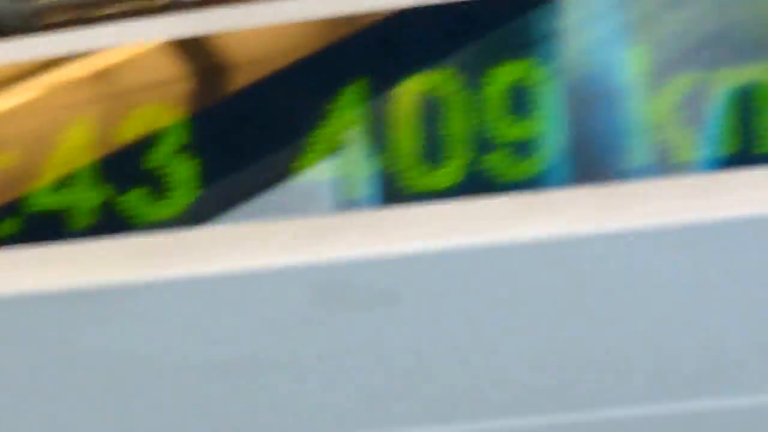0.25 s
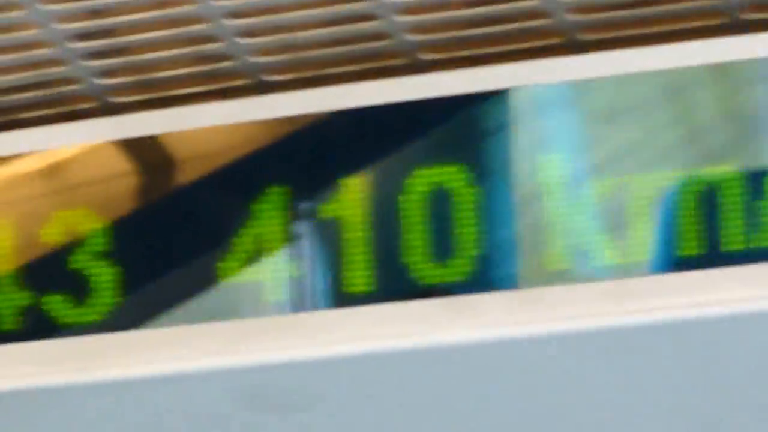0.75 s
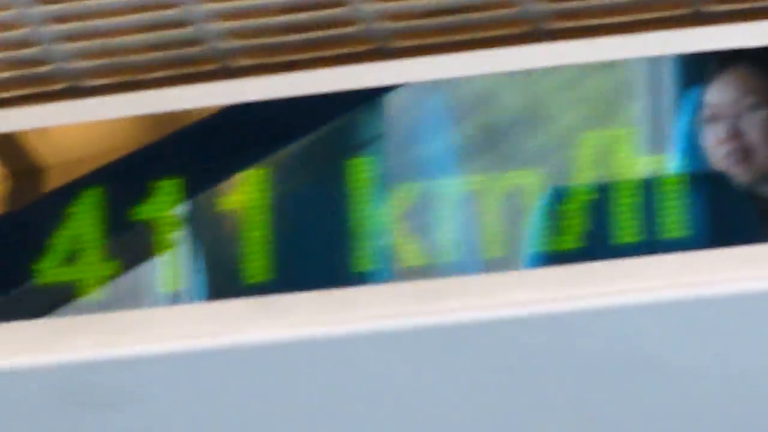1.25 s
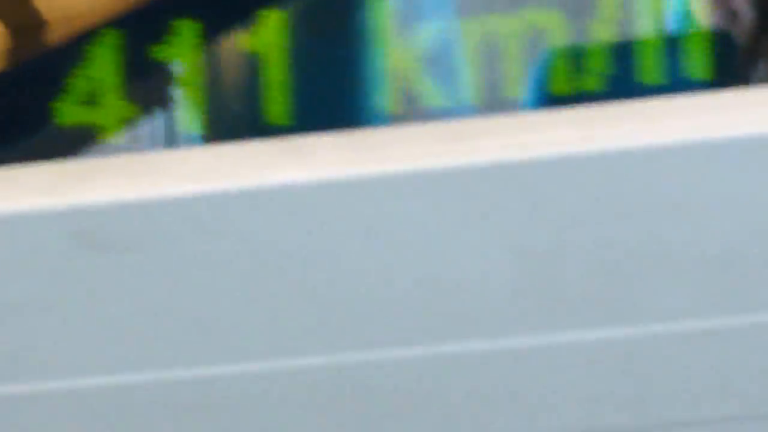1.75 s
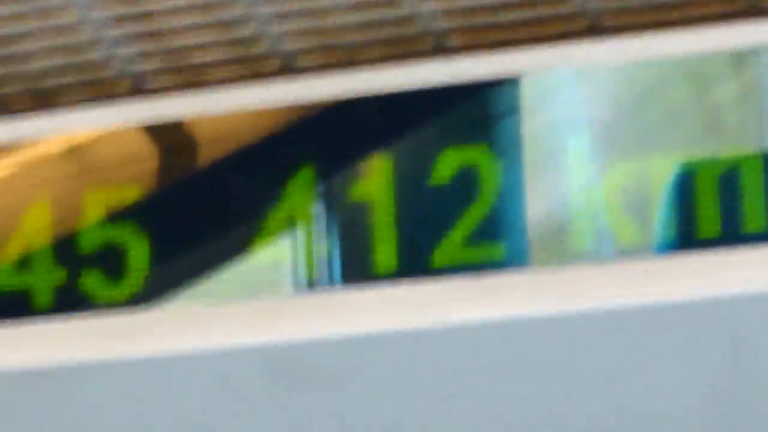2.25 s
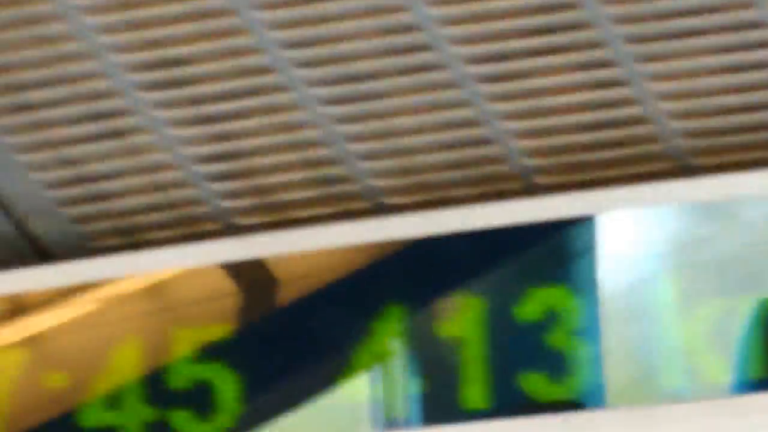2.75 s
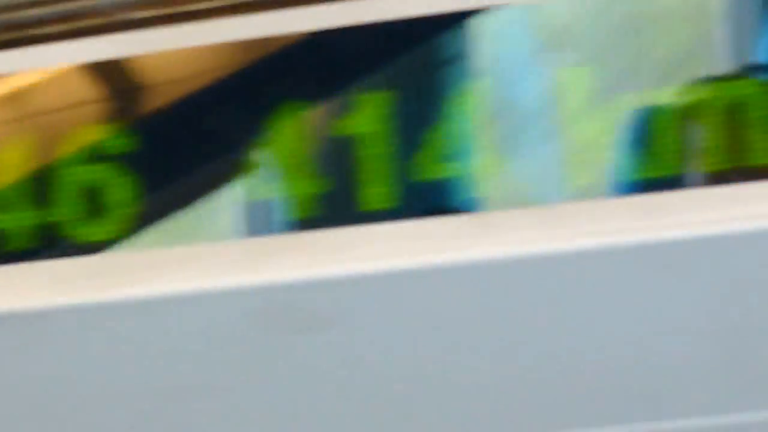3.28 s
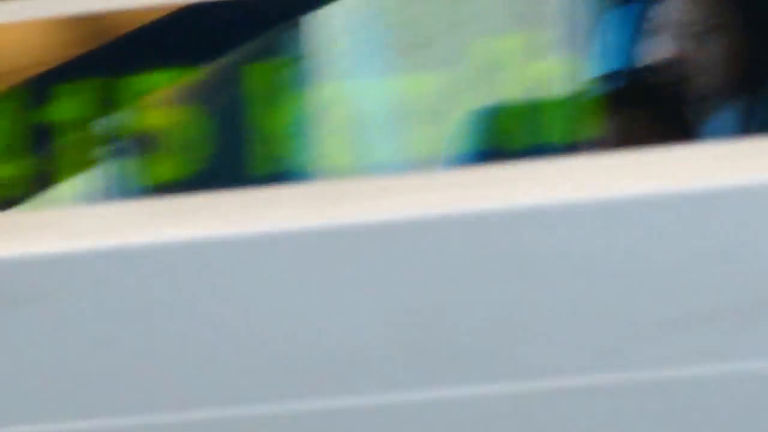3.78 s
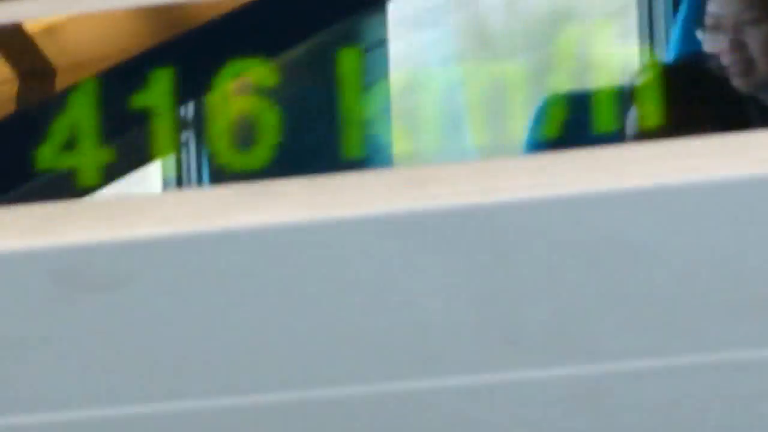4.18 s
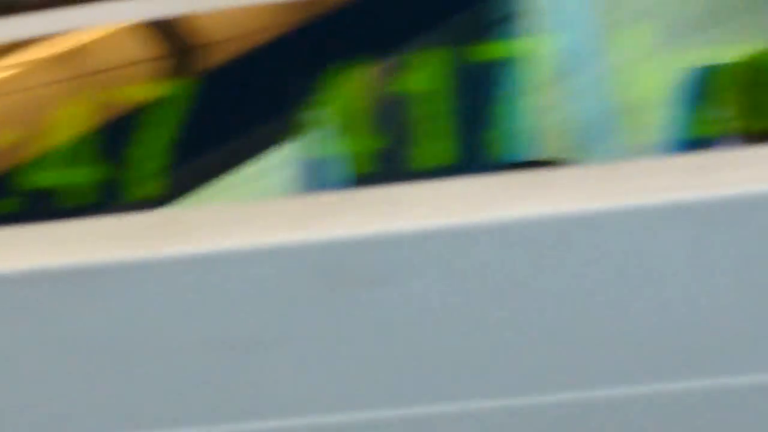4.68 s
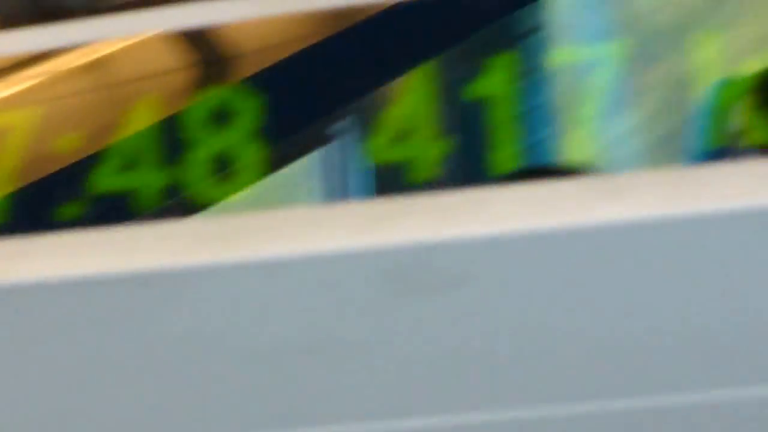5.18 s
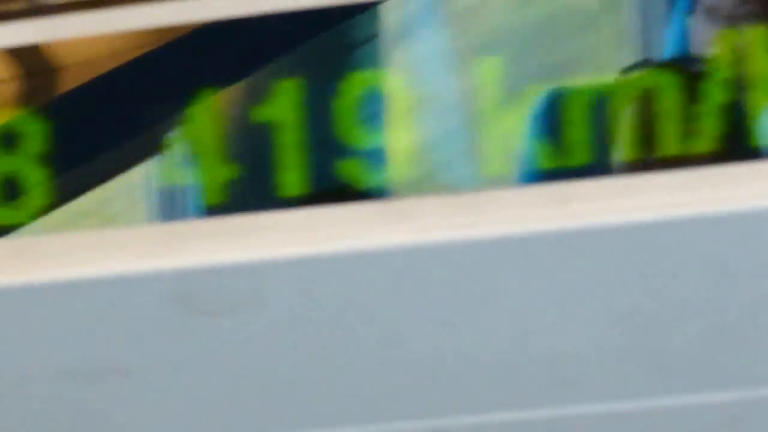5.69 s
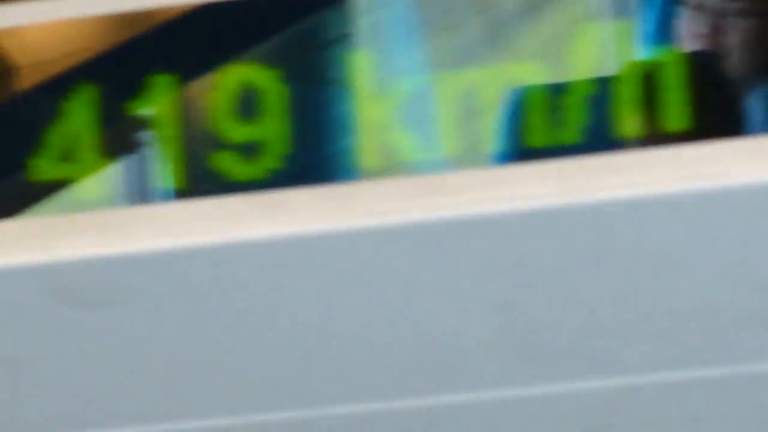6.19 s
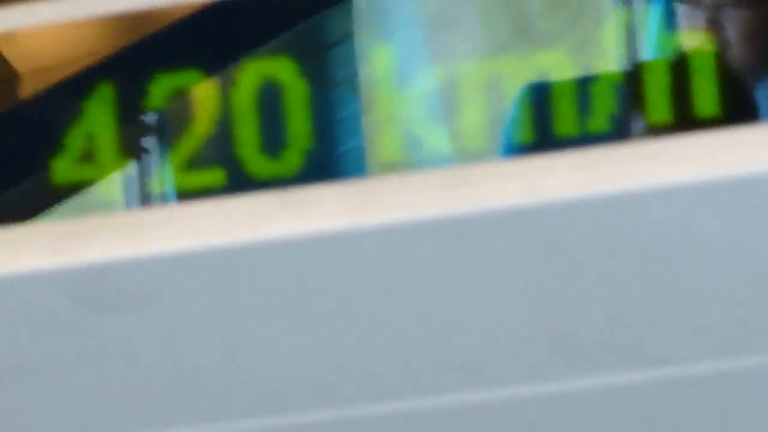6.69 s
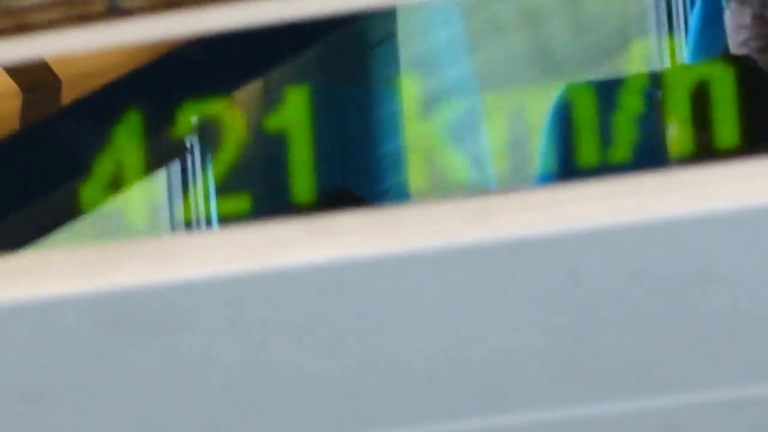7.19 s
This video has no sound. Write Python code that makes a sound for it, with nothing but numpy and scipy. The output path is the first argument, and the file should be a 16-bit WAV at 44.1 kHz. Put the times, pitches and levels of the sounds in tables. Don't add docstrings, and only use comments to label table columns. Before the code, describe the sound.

Inside a very fast train cabin, a dense steady roar of rushing air with a thin, wavering whistle on one pitch and tiny ticks.

```python
import sys
import numpy as np
from scipy import signal
from scipy.fft import next_fast_len
from scipy.io import wavfile
from scipy.ndimage import uniform_filter1d

SR = 44100
rng = np.random.default_rng(int(sys.argv[2]) if len(sys.argv) > 2 else 0)


def materialize(psi):
    bounded = np.clip(np.atleast_2d(psi).T, -1, 1)
    quanta = np.round(bounded * 32767).astype(np.int16)
    wavfile.write(sys.argv[1], SR, quanta)


def ratio_of_db(decibels):
    return 10 ** (np.asarray(decibels, float) / 20)


N = 328104


def evened(x):
    return x / np.sqrt(np.mean(x ** 2) + 1e-20)


def along(rows, column):
    columns = np.transpose(rows)
    return np.interp(np.arange(N) / SR, columns[0], columns[column])


def add(mix, start_s, sound):
    part = mix[round(start_s * SR):][:len(sound)]
    part += sound[:len(part)]


def bumps(rows):
    t = np.arange(N) / SR
    return sum(db * np.exp(-2 * ((t - s) / length) ** 2) for s, db, length in rows)


def smoothed(x, size, second_size=None, axis=0):
    return uniform_filter1d(uniform_filter1d(x, size, axis=axis), second_size or size, axis=axis)


def wander(top_hz):
    size = max(int(SR / top_hz / 2), 2)
    return evened(smoothed(rng.standard_normal(N), size))


def resonate(x, hz, width):
    turn = np.exp(2j * np.pi * np.cumsum(hz * np.ones(len(x))) / SR)
    r = np.exp(-np.pi * width / SR)
    return 2 * (turn * signal.lfilter([1 - r], [1, -r], x / turn)).real


def resonant_noise(hz, width):
    white = rng.standard_normal(N)
    return evened(resonate(resonate(white, hz, width), hz, width))


def turbulence(spectrum, patchy_db, flicker_db):
    frames, hz = N // 512 + 5, np.fft.rfftfreq(2048, 1 / SR)
    real, imaginary, patches = rng.standard_normal((frames, 1025, 3)).T
    patches = uniform_filter1d(patches, size=24, axis=0)
    patches = evened(uniform_filter1d(patches, size=6, axis=1))
    f, db = np.transpose(spectrum)
    colour_db = np.interp(np.log(hz + 1), np.log(f + 1), db, left=-120, right=-120)
    z = (real + 1j * imaginary) * ratio_of_db(colour_db[:, None] + patchy_db * patches)
    noise = signal.istft(z, nperseg=2048, noverlap=1536)[1][768:][:N]
    return evened(noise * ratio_of_db(flicker_db * wander(28)))


# [f/Hz, density level/dB]
BOOM_SPECTRUM = [(12, -56), (20, -40), (56, -10), (102, -3), (136, -7), (178, 0), (205, -5), (243, 0),
                 (291, 0.5), (362, -5.5), (440, -13.5), (570, -17), (970, -120)]
# [f/Hz, width/Hz, level/dB]
CABIN_MODES = [(111.3, 10.7, -40.5), (183.4, 21, -43), (247.2, 22.4, -39), (303, 7.9, -39.5),
               (338.3, 6.7, -42.5), (511.4, 35, -42), (1589, 26, -53), (3760, 740, -55.5)]


def cabin_boom():
    boom = turbulence(BOOM_SPECTRUM, patchy_db=0.28, flicker_db=-0.7)
    for hz, width, db in CABIN_MODES:
        boom = boom + ratio_of_db(db + 25) * resonant_noise(hz, width)
    return evened(boom)


# [f/Hz, density level/dB]
ROAR_SPECTRUM = [(240, -18.5), (400, -0.5), (515, 1.5), (689, -1), (797, -3.5), (1040, -6), (1080, -12),
                 (1400, -32.5), (2380, -120)]
RUSH_SPECTRUM = [(690, -29.5), (1180, -5), (1200, -1.5), (1260, -5), (2360, -12.5), (2830, -16.5),
                 (3400, -18), (5000, -34), (6500, -51.5), (11000, -120)]
# [f/Hz, density level/dB]
HISS_SPECTRUM = [(2820, -41), (4800, -1.5), (10800, -18), (14000, -54.5), (22000, -120)]
LAYER_DB = [-26, -29, -35, -56.5]
# [t/s, depth/dB, length/s]
LULLS = [(.28, 1.5, 0.079), (.51, 3, .06), (.71, 3.5, .04), (.9, 2, 0.093), (1.7, 3, .1), (1.92, 1.5, .05),
         (2.67, 3.5, 0.064), (2.98, 4, 0.046), (3.17, 1.5, 0.046), (3.93, 1, .05), (5.1, 1.5, 0.044),
         (5.22, 0, .04), (5.76, 3, .07), (5.98, 3, 0.081), (6.3, 1, 0.11), (7.14, 1, 0.038), (7.36, 0, .05)]
# [t/s, lift/dB, length/s]
GUSTS = [(.15, 0, .08), (.81, 2, .07), (1.1, 1, .15), (1.47, 1, .12), (2.1, 0.5, .1), (2.55, 0.5, 0.092),
         (3.5, 0.3, 0.14), (4.35, 1, .25), (4.92, 1.5, 0.22), (5.42, 1.5, .12), (6.12, 1, .08),
         (6.6, 1, .2), (6.9, 1, 0.11)]
# [t/s, lift/dB, length/s]
RUSTLES = [(.02, -1, .04), (.41, 3, .05), (1.03, 3, .025), (1.58, 3, .06), (2.33, 3, .15),
           (2.865, 3.5, .025), (3.11, 1.5, .04), (3.48, 4, .04), (3.81, 1.5, .04), (3.99, 4, .025),
           (4.53, 1.5, .04), (4.71, 3, .05), (5.305, 6, .016), (5.62, 2, 0.11), (6.64, 1.5, 0.036),
           (7.02, 4, .05), (7.3, 3, 0.046)]
LULL_SHARE = [0.18, 1, 0.99, 0.58]
GUST_SHARE = [.7, .95, .8, .2]
RUSTLE_SHARE = [.01, .1, .3, .95]


def air():
    layers = [
        cabin_boom(),
        turbulence(ROAR_SPECTRUM, patchy_db=-1.33, flicker_db=-0.66),
        turbulence(RUSH_SPECTRUM, patchy_db=0.5, flicker_db=0.73),
        turbulence(HISS_SPECTRUM, patchy_db=0.5, flicker_db=0.6),
    ]
    lull_db, gust_db, rustle_db = bumps(LULLS), bumps(GUSTS), bumps(RUSTLES)
    out = np.zeros(N)
    shares = zip(layers, LAYER_DB, LULL_SHARE, GUST_SHARE, RUSTLE_SHARE)
    for layer, db, lull, gust, rustle in shares:
        level_db = db - lull * lull_db + gust * gust_db + rustle * rustle_db
        out += ratio_of_db(level_db) * layer
    return out


# [t/s, f/Hz]
WHISTLE_HZ = [(0, 1119), (.3, 1125), (.5, 1121), (.75, 1127), (1.45, 1117), (1.85, 1117), (2.38, 1134),
              (2.55, 1128), (3.25, 1124), (3.9, 1118), (4.55, 1124), (4.8, 1131), (5.4, 1130), (5.7, 1124),
              (6.35, 1132), (6.75, 1121), (7.1, 1129), (7.44, 1131)]
# [t/s, level/dB]
WHISTLE_DB = [(0, -29), (.27, -33.5), (.48, -29), (.8, -32), (1.25, -30), (1.8, -32), (2.35, -31),
              (2.65, -33.5), (3.15, -29.5), (3.65, -30.5), (3.85, -28.5), (4.56, -28.5), (4.7, -30.5),
              (5.05, -28.5), (5.4, -34), (5.95, -32), (6.25, -28.5), (7.44, -33.5)]
# [t/s, depth/dB, length/s]
STALLS = [(.28, 9, .04), (.57, 6, .02), (.72, 9, .03), (1.14, 7, .03), (1.52, 10, .025), (1.95, 9, .025),
          (2.07, 8, .025), (2.61, 10, .05), (3.07, 6, .02), (3.28, 5, .03), (3.38, 10, .025), (3.5, 8, .02),
          (4.03, 8, .025), (4.66, 5, .03), (4.9, 11, .03), (5.13, 8, .04), (5.34, 9, .04), (5.46, 7, .04),
          (5.76, 8, .03), (5.95, 9, .03), (6.19, 9, .02), (6.26, 8, .02), (7.3, 7, .03)]


def whistle():
    hz = along(WHISTLE_HZ, 1) + 0.8 * wander(4.6)
    tone = rng.standard_normal(N)
    for _ in range(3):
        tone = resonate(tone, hz, width=37)
    tone = evened(tone)
    envelope = abs(signal.hilbert(tone, next_fast_len(N))[:N])
    swing = uniform_filter1d(envelope, size=200)
    held = tone / (.6 + swing) ** .15
    strength = np.sqrt(smoothed(held ** 2, 4500))
    level_db = along(WHISTLE_DB, 1) + 1.0 + 1.3 * wander(22) - bumps(STALLS)
    skirt = ratio_of_db(-43.5) * resonant_noise(1160, width=510)
    return ratio_of_db(level_db) * held / strength + skirt


# [t/s, speed/(km/h)]
SPEED_KMH = [
    (0, 408.5),
    (7.44, 423),
]
# [t/s, level/dB]
TEETH_DB = [(0, -56), (1, -54), (1.3, -43.5), (2.0, -45.5), (2.6, -46.5), (3, -53.5), (4.3, -57.5),
            (4.7, -42.5), (5.1, -43.5), (5.6, -58), (6.2, -46.5), (6.7, -50), (7.1, -45), (7.44, -58.5)]


def teeth():
    spacing_m = .0859
    hz = along(SPEED_KMH, 1) / 3.6 / spacing_m + 1.5 * wander(4)
    return ratio_of_db(along(TEETH_DB, 1)) * np.sqrt(2) * np.cos(2 * np.pi * np.cumsum(hz) / SR)


# [t/s, peak level/dB]
TICKS = [(1.0031, -45), (1.0296, -48.5), (1.5569, -46), (1.6094, -51.5), (2.1849, -48.5), (2.4334, -46.5),
         (2.8484, -51), (2.8694, -48.5), (3.465, -47), (3.7658, -48), (3.7993, -48), (3.8097, -45),
         (3.9734, -50), (3.9954, -47), (4.2732, -45), (4.8753, -50.5), (5.2934, -47.5), (5.6414, -49),
         (6.6234, -48), (6.988, -48.5)]
# [t/s, peak level/dB, f/Hz, ring T60/s]
SNAPS = [
    (2.3506, -43.5, 10200, .0024),
    (2.3506, -42, 8600, .003),
    (3.4834, -34, 6500, .002),
    (5.303, -46, 9300, .004),
]


def ticks():
    out, t = np.zeros(N), np.arange(1500) / SR
    hits = [(s, db, 7850, .002) for s, db in TICKS] + SNAPS
    for s, db, hz, t60 in hits:
        ring = np.sin(2 * np.pi * (hz + 900) * t) * ratio_of_db(-60 * t / t60)
        decay = 0.3 * ratio_of_db(-60 * t / 0.011) + ratio_of_db(-16.0 - 60 * t / 0.06)
        rattle = evened(resonate(rng.standard_normal(len(t)), hz, width=3500)) * decay
        add(out, s + .001, ratio_of_db(db + 3) * (ring + rattle))
    return out


# [t/s, peak level/dB, f/Hz, length/s]
SQUEAKS = [
    (2.286, -53, 7450, .016),
    (2.452, -53, 7500, .014),
    (1.032, -55, 6700, .02),
]


def squeaks():
    out = np.zeros(N)
    for s, db, hz, length in SQUEAKS:
        size = len(np.arange(0, length, 1 / SR))
        rub = evened(resonate(rng.standard_normal(size), hz, width=300))
        add(out, s, ratio_of_db(db) * 0.87 * rub * signal.windows.tukey(size, .5))
    return out


def small_parts():
    treble = signal.butter(2, 4500, "high", fs=SR, output="sos")
    return signal.sosfilt(treble, ticks() + squeaks())


def scene():
    return (air() + whistle() + teeth() + small_parts())[None]


def roll_off(x):
    return signal.sosfilt(signal.butter(12, 11005, fs=SR, output="sos"), x)


def record(dry):
    dry = signal.sosfilt(signal.butter(2, 38, "high", fs=SR, output="sos"), dry)
    mean_power = np.mean(dry ** 2)
    power = signal.lfilter([1 / 900], [1, 1 / 900 - 1], dry[0] ** 2, zi=[mean_power])[0]
    over_db = 10 * np.log10(power / mean_power)
    levelled = dry / ratio_of_db(0.25 * over_db - 1.0)
    return roll_off(levelled)


dry = scene()
out = record(dry)
materialize(out)
```